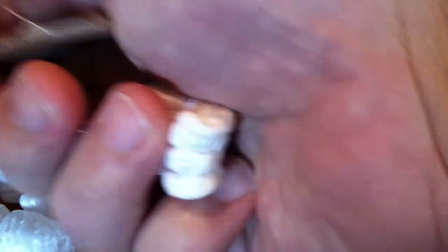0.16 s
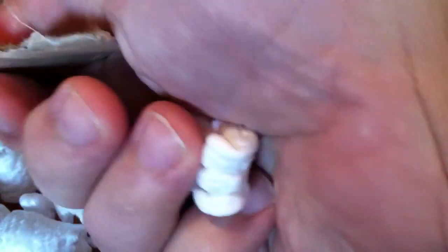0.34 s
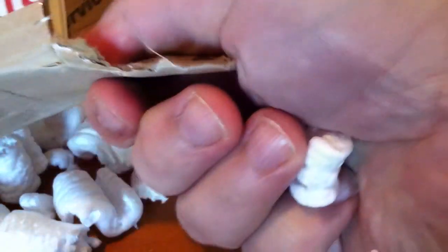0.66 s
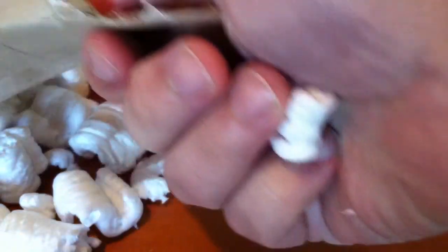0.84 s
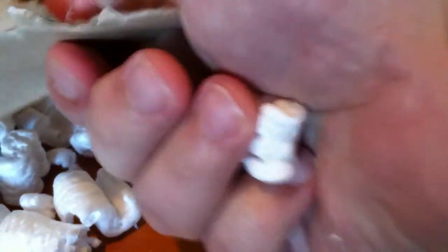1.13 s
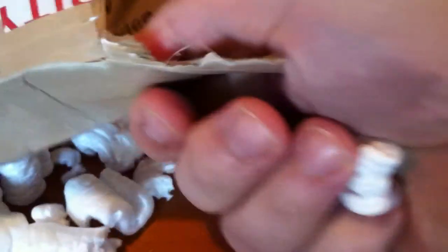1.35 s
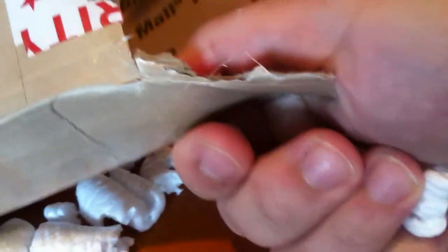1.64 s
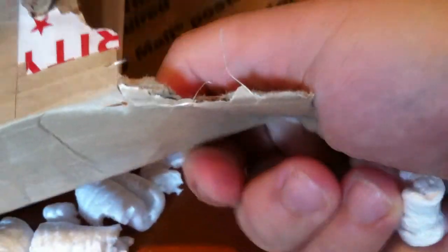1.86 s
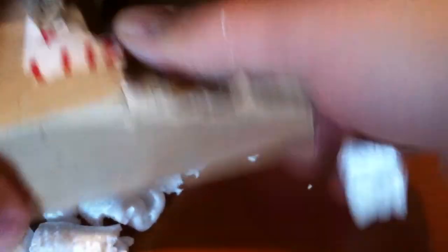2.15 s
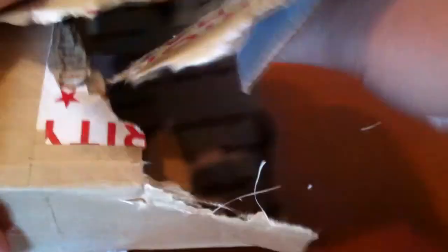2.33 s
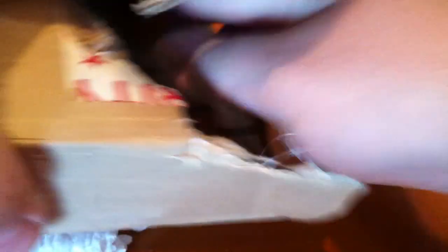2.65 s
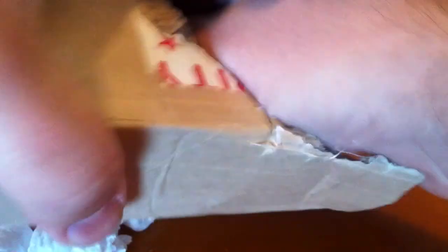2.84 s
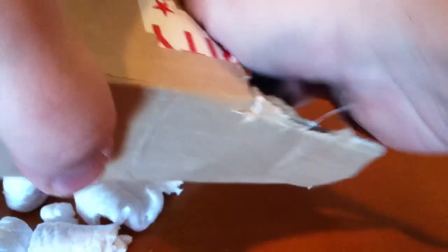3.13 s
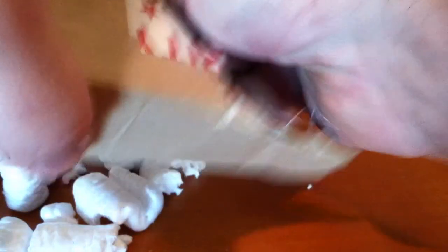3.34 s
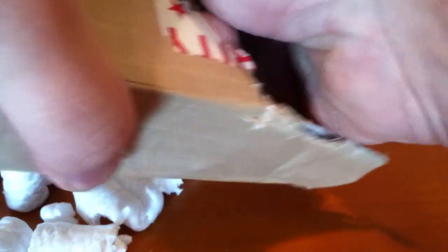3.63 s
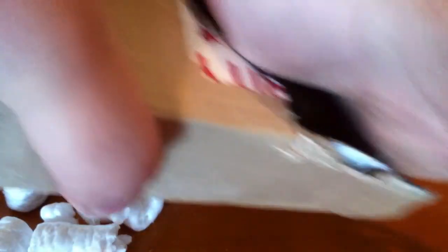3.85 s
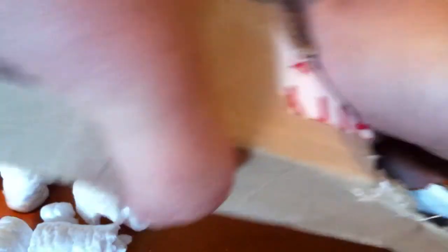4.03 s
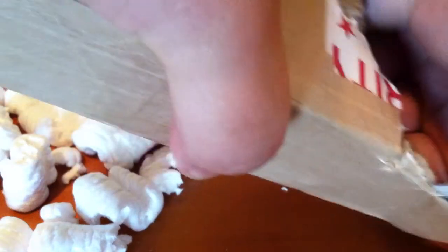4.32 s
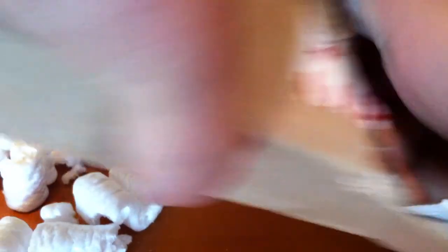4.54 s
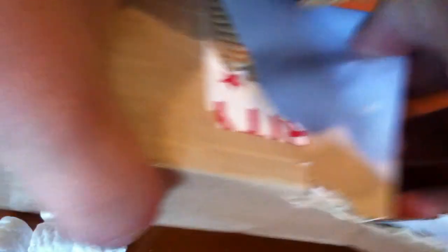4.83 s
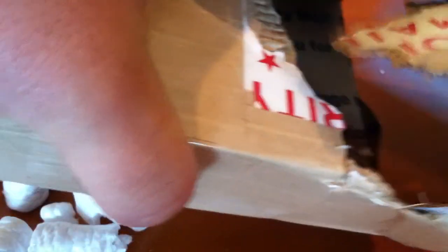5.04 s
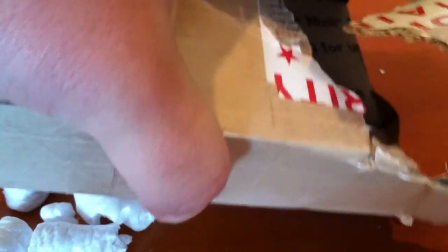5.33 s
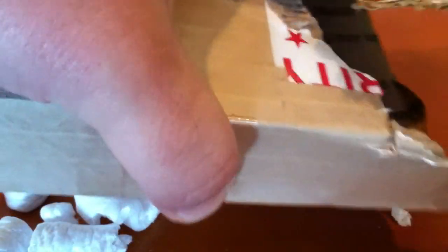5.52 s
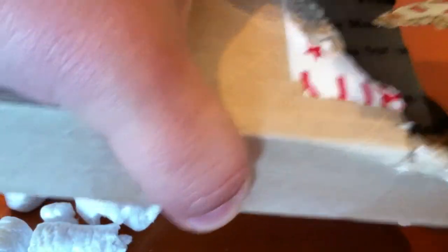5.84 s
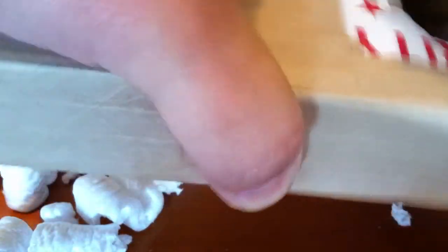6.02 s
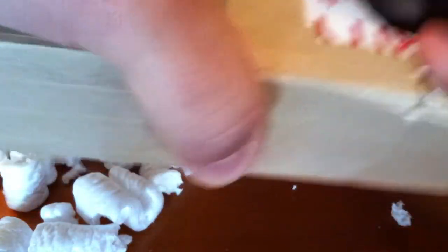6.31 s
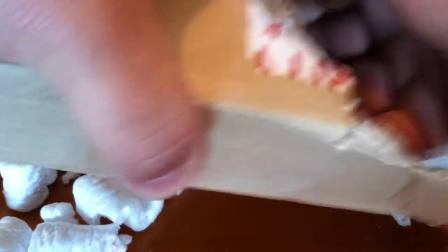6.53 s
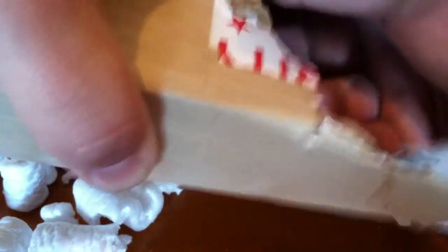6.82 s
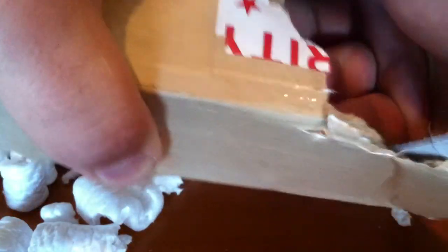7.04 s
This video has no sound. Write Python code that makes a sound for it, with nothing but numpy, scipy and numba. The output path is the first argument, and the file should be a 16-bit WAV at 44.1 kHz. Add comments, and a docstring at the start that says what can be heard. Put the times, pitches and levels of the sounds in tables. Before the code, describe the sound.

Brittle foam squeaks, ticks and snaps over dull, papery cardboard scraping. A faint start breaks into very sharp crackles, then the box shudders low and the rustle thins out, with isolated cracks and hollow knocks. Activity thickens again toward five seconds, cuts out for an instant just before six, and ends in gentler rubbing and knocking. Close, bass-light small microphone, short dense room echo, faint steady hush.

```python
"""Hands dig through a cardboard box of foam packing fill on a table, close to a small microphone.
A crackling outburst comes within the first second, then a low shudder of the box and sparser rustle; a second
outburst peaks near five seconds, the sound drops out for an instant at 5.75 s, and knocks and softer rustle
end it. Foam is swarms of tiny noise slips, with louder cracks and short swells of resonant noise; the walls are
dull resonances, rubbed and knocked; a small furnished room answers in dense echoes, over a faint steady hush."""
import sys
import numpy as np
from scipy import signal
from scipy.fft import rfft, irfft, next_fast_len
from scipy.io import wavfile
from scipy.ndimage import uniform_filter1d
from numba import njit

SR = 44100
rng = np.random.default_rng(int(sys.argv[2]) if len(sys.argv) > 2 else 0)


def generate_wav(signal):
    """Clip the signal to [-1, 1] and save it as 16-bit WAV at the path in sys.argv[1]."""
    frames = np.transpose(np.atleast_2d(signal))
    scaled = np.clip(frames, -1, 1) * 32767
    pcm = np.round(scaled).astype(np.int16)
    wavfile.write(sys.argv[1], SR, pcm)


def volts_from_decibels(level):
    """Turn decibel levels (scalar or array-like) into linear amplitude factors."""
    exponent = np.asarray(level, float) / 20
    return 10 ** exponent


N = 316197  # samples, 7.17 s

# strokes of the hand, each one swell of rustle: peak_s, rise_s, fall_s, foam_rustle_db, cardboard_scrape_db
HAND_STROKES = [(0.0, .05, 0.039, -54.5, -47.5), (0.093, 0.083, 0.087, -57, -60),
                (0.233, 0.26, 0.31, -51, -52.5), (0.389, 0.0064, 0.18, -50, -53.5),
                (0.497, 0.013, 0.19, -33, -39.5), (0.615, 0.099, 0.05, -54, -39),
                (0.716, 0.15, 0.055, -34, -40.5), (0.802, 0.079, 0.06, -34, -38),
                (1.025, 0.15, 0.17, -46, -50), (1.215, 0.2, 0.072, -47, -45),
                (1.345, 0.033, 0.087, -38.5, -48.5), (1.442, 0.084, 0.062, -34.5, -39.5),
                (1.747, 0.4, 0.26, -48, -51.5), (2.006, 0.08, 0.055, -43, -47.5),
                (2.136, 0.15, 0.066, -44, -50.5), (2.266, 0.31, 0.14, -51, -52.5),
                (2.368, 0.042, 0.11, -54, -70), (2.493, 0.039, 0.053, -46, -44.5),
                (2.78, 0.44, 0.65, -51.5, -51.5), (2.896, 0.1, 0.058, -66, -44),
                (3.053, 0.19, 0.034, -44.5, -42), (3.284, 0.15, 0.089, -47, -45.5),
                (3.476, 0.088, 0.07, -47.5, -44), (3.619, 0.18, 0.23, -52, -47),
                (3.834, 0.076, 0.15, -49.5, -48.5), (4.044, 0.12, 0.082, -45, -44.5),
                (4.222, 0.029, .12, -47, -43.5), (4.308, 0.01, 0.17, -58, -46),
                (4.405, 0.083, 0.079, -45, -41), (4.567, 0.013, 0.036, -42, -38),
                (4.623, 0.021, 0.057, -32, -35), (4.715, 0.12, 0.11, -34.5, -35.5),
                (4.849, 0.018, 0.085, -37, -35), (5.099, 0.13, 0.078, -36.5, -38),
                (5.177, 0.11, 0.024, -42, -49), (5.489, 0.06, 0.1, -46, -54),
                (5.764, 0.00087, .1, -31.5, -40), (5.88, 0.041, 0.094, -39.5, -41),
                (6.04, 0.25, 0.38, -49.5, -64), (6.2, 0.12, 0.28, -53, -46.5),
                (6.305, 0.053, 0.034, -41, -41), (6.481, 0.17, 0.11, -47.5, -46),
                (6.596, 0.11, 0.088, -49.5, -45.5), (6.772, 0.16, 0.17, -45.5, -50),
                (6.918, 0.092, 0.058, -47.5, -41.5), (7.05, 0.097, 0.11, -48.5, -43),
                (7.17, 0.093, .1, -50, -47.5)]
# resonances of the cardboard walls and the air in the box: pitch_hz, width_hz, level_db
BOX_MODES = [(130, 120, -12.5), (183.7, 41, -3), (229, 66, -7), (307, 127, 1.5), (408.4, 81, 1),
             (599, 94, 2.5), (699, 102, -1), (757, 67, 1), (960, 247, 3.5), (1080, 86, -1), (1250, 117, 3),
             (1372, 49, 0.5), (1800, 260, -2)]


def unit(x):
    """Scale to rms 1."""
    return x / np.sqrt(np.mean(x ** 2))


def colour(x, points):
    """Equalise a sound along (Hz, dB) points, joined on a logarithmic pitch scale."""
    hz, db = np.transpose(points)
    size = next_fast_len(len(x))
    bins_hz = np.maximum(np.arange(size // 2 + 1) * SR / size, 1)
    gain = volts_from_decibels(np.interp(np.log(bins_hz), np.log(hz), db))
    return irfft(rfft(x, size) * gain, size)[:len(x)]


def ring(x, hz, width_hz):
    """Two-pole resonance, gain 1 at the centre."""
    return signal.lfilter(*signal.iirpeak(hz, hz / width_hz, fs=SR), x)


@njit
def sweep(x, hz, share):
    """Band-pass whose centre moves; its width is a share of the centre."""
    y, band, low = np.empty(len(x)), 0., 0.
    for i in range(len(x)):
        g = np.tan(np.pi * hz[i] / SR)
        v = (band + g * (x[i] - low)) / (1 + g * (g + share))
        low = low + 2 * g * v
        band = 2 * v - band
        y[i] = share * v
    return y


def walk(rate_hz):
    """Random levels that glide from one to the next at the given rate; rms 1."""
    hold = int(SR / rate_hz)
    levels = np.repeat(rng.standard_normal(N // hold + 1), hold)
    return unit(uniform_filter1d(levels, hold)[:N])


def add(track, start_s, piece, peak_db):
    """Place a piece with a given peak level."""
    i = int(start_s * SR)
    piece = piece[:N - i]
    track[i:i + len(piece)] += piece * volts_from_decibels(peak_db) / np.abs(piece).max()


def swells(peak_db, steepness):
    """Level in dB of all strokes together; each rises to its peak and dies away at its own pace."""
    swell_db = 15  # at steepness 1 a stroke climbs this much in its rise and sinks this much in its fall
    t, power = np.arange(0, N, 32) / SR, 1e-10
    for (peak_s, rise_s, fall_s, *_), db in zip(HAND_STROKES, peak_db):
        away = np.maximum((peak_s - t) / rise_s, (t - peak_s) / fall_s)
        power = power + volts_from_decibels(db - steepness * swell_db * away) ** 2
    return np.interp(np.arange(N) / SR, t, 10 * np.log10(power))


def slips(rate_hz, spread_db, tail_s, smooth):
    """Loudness of a swarm of slips: quick starts, a few large among many small, each with a short tail."""
    slipping, luck = rng.random((2, N))
    rank = -np.log(1 - luck).clip(-2.6, 0)  # exponential spread, capped
    size = (slipping < rate_hz / SR) * volts_from_decibels(spread_db * rank)
    power = signal.lfilter([1], [1, -np.exp(-2 / (tail_s * SR))], size ** 2)
    power = uniform_filter1d(power, size=int(tail_s * SR / 2))
    # smooth is the steady power beneath the slips
    return np.sqrt(power / power.mean() + smooth) / np.sqrt(1 + smooth)


def foam(swarm, rustle_db, swish_hz, top_db):
    """Each slip is a tiny burst of noise; pieces of other sizes shift the colour from moment to moment."""
    # tone curve of the rustle: pitch_hz, gain_db
    foam_tone = [(880, -33), (1500, -5), (2100, -2.5), (2880, 0), (3620, -3), (4000, -2), (4330, -2.5),
                 (4970, -2.5), (8000, -6), (11700, -26.5), (13900, -27.5), (16000, -53)]
    ticks = (rng.random(N) < 400 / SR) * rng.laplace(size=N)  # single cells of foam burst with a dry click
    clicks = signal.lfilter([1], [1, 0, 0.6], ticks)
    raw = swarm * (rng.standard_normal(N) + 2.94 * clicks)
    parts = 0
    for hz in 1600 * 1.25 ** np.arange(11):
        # now and then one piece of this size pops alone and rings for a few cycles
        pops = (rng.random(N) < 12 / SR) * rng.standard_normal(N) * np.sqrt(SR / hz)
        parts = parts + volts_from_decibels(5.4 * walk(20)) * ring(raw, hz, 0.3 * hz)
        parts = parts + 9.4 * ring(pops, hz, 0.16 * hz)
    # the gap between hand, wall and fill favours one band, which shifts as the hand changes its grip
    gap = sweep(raw, swish_hz, 0.067)
    rustle = unit(colour(parts + 0.86 * gap, foam_tone))
    top_octave_hz = 9000
    body = colour(rustle, [(0.85 * top_octave_hz, 0), (1.2 * top_octave_hz, -40)])
    return volts_from_decibels(rustle_db) * (body + volts_from_decibels(top_db) * (rustle - body))


def cardboard(swarm, scrape_db, boom_db):
    """The same rubbing shakes the walls; the answer of each mode wanders as the hands move."""
    low, high = 0, 0
    for hz, width_hz, db in BOX_MODES:
        friction = swarm * rng.standard_normal(N)
        mode = volts_from_decibels(db + 2.37 * walk(14)) * ring(friction, hz, width_hz)
        if hz < 480:
            low = low + ring(mode, hz, 3 * width_hz)
        else:
            high = high + mode
    return volts_from_decibels(boom_db) * unit(low) + volts_from_decibels(scrape_db) * unit(high)


def cracks():
    """A snap and a short crumbling burst, strongest round the piece's own resonance, weak in the top octave."""
    # single cracks of foam, tape and wrapping: start_s, peak_db, pitch_hz
    crack_list = [(0.095, -22, 1800.0), (0.491, -17.5, 6540), (0.503, -19, 7600), (0.525, -12.5, 4800),
                  (0.571, -10.5, 4050), (0.577, -12.5, 3980), (0.592, -8.5, 4150), (0.6093, -4, 4700),
                  (0.616, -9.5, 5640), (0.622, -17, 5660), (0.63, -21, 4830), (0.702, -24, 5000),
                  (0.706, -17.5, 6100), (0.728, -20, 4200.0), (1.216, -33.5, 3100), (1.313, -32, 7900),
                  (1.39, -22, 7100), (1.404, -16.5, 3000), (1.434, -21.5, 6000), (1.4524, -11.5, 5300),
                  (1.483, -29, 7800), (1.506, -15.5, 6600), (1.56, -28, 7400), (1.604, -28, 5600),
                  (1.614, -26, 7700), (1.647, -30, 4360), (1.78, -29, 6700), (1.877, -27.5, 1930),
                  (1.921, -24, 3050), (2.016, -26, 2960), (2.056, -32.5, 2430), (2.084, -33, 3470),
                  (2.122, -39, 3190), (2.191, -36, 1790), (2.204, -34, 2370), (2.391, -42.5, 4670),
                  (2.524, -38, 6960), (2.508, -33, 3080), (2.54, -35, 3670), (2.565, -39.5, 3000),
                  (2.648, -35, 3880), (2.886, -31, 1850), (2.887, -33, 2700), (3.447, -23, 3570),
                  (3.581, -42, 2460), (3.612, -18.5, 2720), (3.63, -33, 2400), (3.656, -25.5, 3300),
                  (3.81, -36.5, 3000), (3.832, -36, 3900), (3.995, -22.5, 4200), (4.212, -25.5, 4930),
                  (4.219, -33, 2840), (4.274, -28, 4540), (4.3, -17.5, 2850), (4.399, -20, 2980),
                  (4.556, -31, 5600), (4.57, -31, 2100), (4.581, -21.5, 4400), (4.618, -18.5, 3250),
                  (4.68, -29, 4410), (4.713, -20, 3300.0), (4.819, -28, 2100.0), (4.844, -12, 2900),
                  (4.853, -10.5, 4260), (4.879, -22.5, 5400), (5.034, -8, 3230), (5.08, -26, 1900),
                  (5.485, -27.5, 4500), (5.767, -19, 2320), (5.767, -18, 5300), (5.872, -23, 3200),
                  (6.03, -39, 4950), (6.222, -39, 1720), (6.263, -38, 1680), (6.375, -32, 1750),
                  (6.488, -22.5, 1800.0), (6.627, -32.5, 2560), (6.632, -38, 2550), (6.718, -41, 2500),
                  (6.79, -33, 3600.0), (6.866, -44, 2410), (6.879, -37, 2350), (7.04, -25.5, 1920),
                  (7.06, -31, 1800.0)]
    out, t = np.zeros(N), np.arange(2000) / SR
    top = signal.butter(3, 8500, fs=SR, output="sos")
    envelope = (1 - np.exp(-t / 0.00056)) * (volts_from_decibels(-60 * t / 0.0066) + 0.13 * volts_from_decibels(-60 * t / 0.034))
    for start_s, peak_db, hz in crack_list:
        burst = rng.standard_normal(len(t)) * envelope
        burst[8] += 3  # the first break
        # large dull pieces ring more purely than small bright ones,
        # and a hard break is more snap than ring; an overtone brightens it
        snap = ring(ring(burst, 0.78 * hz, min(2.1 * hz, 6000)), hz, 10600)
        snap = volts_from_decibels(0.44 * (peak_db + 27.5)) * (hz / 4000) ** 0.78 * snap
        width_hz = 0.24 * hz
        tone = ring(ring(burst, hz, width_hz), hz, 3 * width_hz)
        overtone = ring(burst, 1.66 * min(hz, 5000), 1.83 * width_hz)
        crack = snap + 3.76 * tone + 1.01 * overtone
        add(out, start_s, signal.sosfilt(top, crack), peak_db)
    return out


def knocks():
    """A short rough push rings the modes that lie near the struck spot; low spots are pushed more softly."""
    # knocks and creases of the walls: start_s, peak_db, pitch_hz of the struck spot
    knock_list = [(0.14, -42, 1100), (0.493, -25, 406), (0.608, -30.5, 410), (0.8, -26.5, 850),
                  (0.858, -16, 980), (1.39, -29, 610), (1.401, -28.5, 283), (1.402, -29, 860),
                  (1.434, -30, 710), (1.453, -21.5, 1460), (1.601, -35, 425), (1.635, -36.5, 487),
                  (1.699, -33, 604), (1.758, -32.5, 670), (1.73, -34, 376), (1.73, -29, 1170),
                  (1.99, -39, 181), (1.993, -37, 1100), (2.205, -38, 288), (2.206, -36, 1000),
                  (2.366, -38.5, 1250), (2.495, -35, 1100), (2.511, -32, 1100), (2.541, -37, 695),
                  (2.566, -37, 606), (2.841, -28.5, 895), (2.886, -17, 633), (2.905, -33, 690),
                  (2.93, -33, 754), (2.945, -32, 700), (3.118, -32, 830), (3.614, -18.5, 827),
                  (3.872, -24.5, 900), (3.873, -35.5, 228), (3.992, -26.5, 344), (3.995, -24.5, 656),
                  (4.111, -32, 1380), (4.213, -29.5, 1430), (4.301, -21.5, 359), (4.303, -18, 900),
                  (4.308, -18.5, 840), (4.564, -29, 1090), (4.576, -27, 990), (4.581, -22.5, 1000),
                  (4.696, -26, 1300), (4.71, -18, 1260), (4.744, -21.5, 1080), (4.761, -39, 130.0),
                  (4.85, -22, 1080), (4.874, -24.5, 1290), (5.037, -34, 1380), (5.079, -19.5, 950),
                  (5.081, -34, 252), (5.765, -27.5, 424), (6.174, -37.5, 223), (6.176, -28.5, 864),
                  (6.226, -32, 910), (6.261, -30, 915), (6.305, -38, 250), (6.307, -19.5, 840),
                  (6.377, -30, 1100), (6.485, -26.5, 1090), (6.578, -35, 294), (6.58, -33, 750),
                  (6.739, -38, 1100), (6.869, -30, 960.0), (7.035, -22, 1080), (7.059, -28, 960)]
    out, t = np.zeros(N), np.arange(5000) / SR
    for start_s, peak_db, spot_hz in knock_list:
        contact = t * spot_hz / 0.53  # 1 when the smooth push ends
        fade = volts_from_decibels(-60 * t * (spot_hz / 1000) ** 0.63 / 0.021)
        rough = rng.standard_normal(len(t)) * np.minimum(contact / 2.1, 1) * fade
        push = (contact < 1) * np.sin(np.pi * contact) + 0.92 * rough
        spread = (spot_hz / 1000) ** 0.3  # a soft low push wakes fewer modes
        modes = 0
        for hz, width_hz, db in BOX_MODES:
            distance = np.log(hz / spot_hz) / (0.16 * spread)
            near = np.exp(-distance ** 2) + 0.2 * spread
            modes = modes + near * volts_from_decibels(db) * ring(push, hz, 0.88 * width_hz)  # purer than when rubbed
        focused = ring(modes, spot_hz, 2.37 * spread * spot_hz)
        add(out, start_s, ring(focused, 2 * spot_hz, 8.8 * spot_hz), peak_db)
    return out


def rubs_and_shudder():
    """A quick swell of noise through one resonance: high for a rub, low for a shudder of the box."""
    # short rubs of one piece along skin or wall, and a low shudder of the box near 1 s:
    # middle_s, length_s, level_db (rms at the crest), pitch_hz
    swell_list = [(0.092, .017, -47, 2180), (0.296, 0.0057, -45, 2450), (0.385, .018, -49, 2300),
                  (1.003, 0.019, -35, 229), (1.044, 0.036, -44, 229), (2.15, 0.022, -49, 3070),
                  (2.266, 0.028, -49, 3280), (2.366, 0.014, -55, 7000), (2.412, 0.068, -58, 4800),
                  (2.474, 0.016, -46.5, 3480), (4.036, 0.13, -54, 4400), (4.625, .025, -40.5, 4500),
                  (5.155, 0.028, -41.5, 4380), (5.31, 0.14, -58, 378), (5.816, 0.075, -47, 5230),
                  (5.81, 0.075, -50, 2300), (6.044, 0.056, -48.5, 5150), (6.27, 0.025, -47.5, 4400),
                  (6.426, .02, -50.5, 3110), (6.48, .02, -38, 1710), (6.596, 0.066, -46, 4650),
                  (6.61, 0.057, -51, 2510), (6.766, 0.028, -49, 3000), (6.775, 0.044, -48.5, 4140),
                  (6.92, 0.055, -47.5, 1000), (7.073, 0.027, -61, 1800)]
    out, t = np.zeros(N), np.arange(-3500, 3500) / SR
    for middle_s, length_s, db, hz in swell_list:
        width_hz = 0.17 * hz
        tone = ring(ring(rng.standard_normal(len(t)), hz, width_hz), hz, 2 * width_hz)
        swell = np.exp(-(2 * t / length_s) ** 4)
        i = int((middle_s + t[0]) * SR)
        piece = (unit(tone * swell) * np.sqrt(np.mean(swell ** 2)))[:N - i]
        out[i:i + len(piece)] += volts_from_decibels(db) * piece
    return out


def room(x):
    """Dense echoes that build over some milliseconds and fade, the treble sooner."""
    t60_s, level_db = 0.95, -15.5
    t = np.arange(SR // 2) / SR
    noise = rng.standard_normal(len(t)) * (1 - np.exp(-t / 0.0016))
    dull = signal.lfilter([0.4], [1, -0.6], noise)
    bright = noise - dull
    tail = dull * volts_from_decibels(-60 * t / t60_s) + bright * volts_from_decibels(-60 * t / (0.2 * t60_s))
    tail = tail / np.sqrt(np.sum(tail ** 2))
    return volts_from_decibels(level_db) * signal.fftconvolve(x, tail)[:N]


def hush():
    """Faint steady background: noise shaped by a fixed tone curve."""
    # tone curve of the hush: pitch_hz, gain_db
    hush_tone = [(15, -22), (25, 21.5), (49, -4), (317, 2), (1020, -10.5), (1370, -6), (5000, -53),
                 (13600, -28), (16000, -48)]
    level_db = -63.5  # rms ahead of the microphone
    return volts_from_decibels(level_db) * unit(colour(rng.standard_normal(N), hush_tone))


def scene():
    """Rustle, cracks, knocks, rubs and a shudder in the room over a faint hush."""
    # slow drift: time_s, boom_db of the box against the scrape, swish_hz (centre), top_db of the top octave
    drift = [(0.0, -4, 4940, 3), (0.16, -0.5, 2080, 6.5), (0.3, -9.5, 2290, -4), (0.499, 0.5, 6050, 4),
             (0.78, 0, 4970, -1.5), (0.9, -2, 4540, 1), (1.042, -6, 6340, 1.5), (1.301, 0, 7500, 3.5),
             (1.9, 2.5, 7440, 3.5), (2.15, -14, 3200, -1), (2.55, -2, 4560, 3), (2.9, -10, 2300, -3),
             (3.3, -6, 6370, 1.5), (3.65, -4.5, 4140, -5), (4.0, -8, 4740, -6), (4.6, -8, 4600, 0.5),
             (5.1, -5, 4650, 1.5), (5.4, 2, 2820, 6), (5.75, -4.5, 5060, -10.5), (6.05, -12, 5300, 3),
             (6.5, -3.5, 4360, 2.5), (6.95, -3.5, 3070, 1), (7.17, -2, 2820, -2)]
    *_, foam_db, wall_db = np.transpose(HAND_STROKES)
    rustle_db = swells(foam_db, steepness=1)
    scrape_db = swells(wall_db, steepness=1.054)  # the walls need pressure: a steeper swell than the foam's
    time_s, *columns = np.transpose(drift)
    boom_db, swish_hz, top_db = (np.interp(np.arange(N) / SR, time_s, c) for c in columns)
    swish_hz = swish_hz * 2 ** (0.1 * walk(13))  # the grip never rests
    fine = slips(rate_hz=390, spread_db=4.5, tail_s=0.0063, smooth=0.55)
    # the walls feel the fine slips and, on top of them, coarser catches of the skin
    catches = slips(rate_hz=83, spread_db=1.5, tail_s=0.0054, smooth=2.5)
    rustle = foam(fine, rustle_db, swish_hz, top_db)
    scrape = cardboard(catches * fine ** 1.23, scrape_db, scrape_db + boom_db)
    near = rustle + scrape + cracks() + knocks() + rubs_and_shudder()
    return (near + room(near) + hush())[None]


def top_cut(x):
    """Nothing passes above the cut-off."""
    return signal.sosfilt(signal.butter(12, 16000, fs=SR, output="sos"), x)


def record(dry):
    """A small microphone thin in the bass, peaky in the treble; loud peaks leak thump; one short dropout."""
    thump = signal.sosfilt(signal.butter(1, 70, fs=SR, output="sos"), dry ** 2)
    thin = signal.sosfilt(signal.butter(2, 110, "high", fs=SR, output="sos"), dry)
    x = thin + 0.2 * (thump - thump.mean())
    x = x + 0.18 * ring(x, 8320, 480)  # the microphone's own resonance
    # start_s and end_s of the dropout
    dropout_s = (5.753, 5.761)
    t = np.arange(N) / SR
    outside_s = np.maximum(dropout_s[0] - t, t - dropout_s[1])
    mix = x * np.clip(outside_s / 0.002, 0.003, 1)  # 2 ms slopes down to a trace
    return top_cut(mix)


dry = scene()
out = record(dry)
generate_wav(out)
```